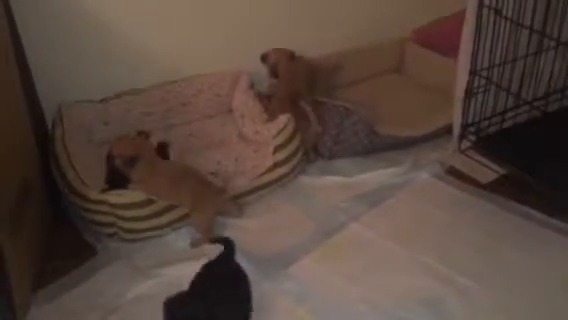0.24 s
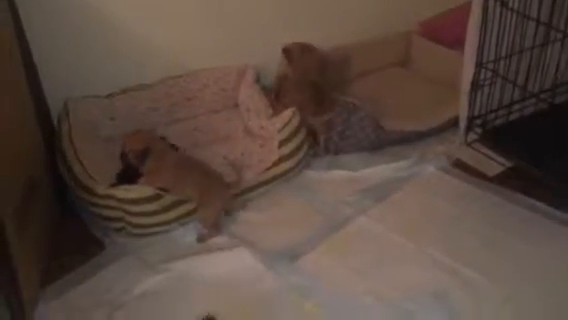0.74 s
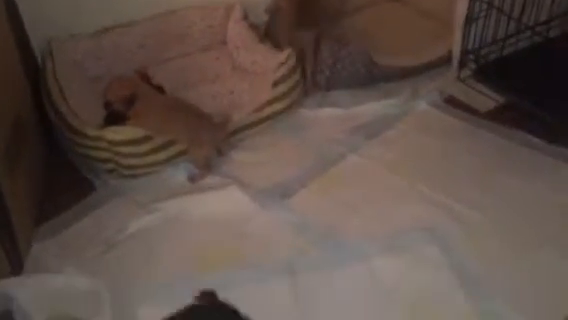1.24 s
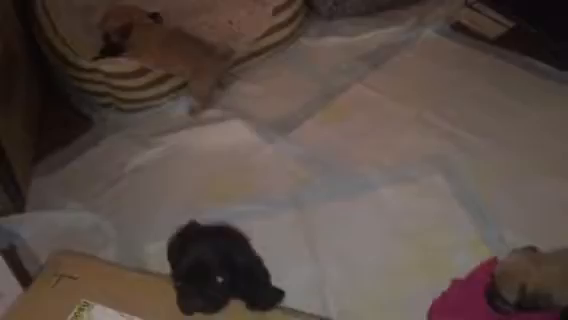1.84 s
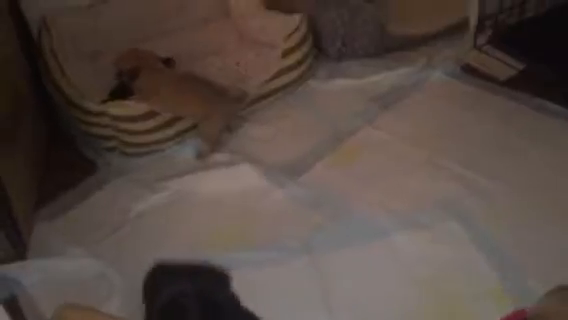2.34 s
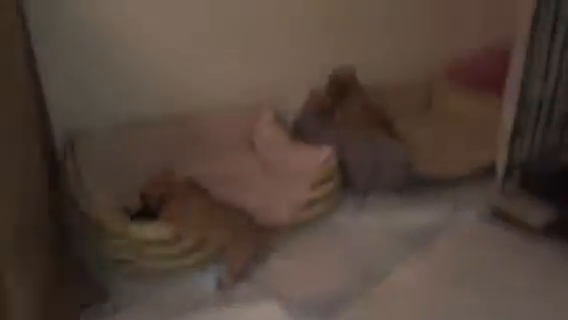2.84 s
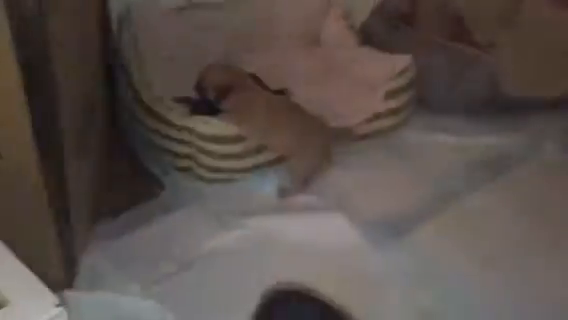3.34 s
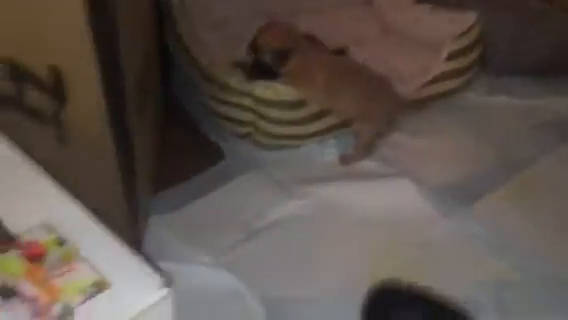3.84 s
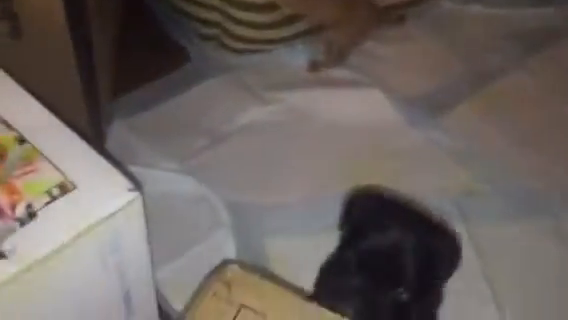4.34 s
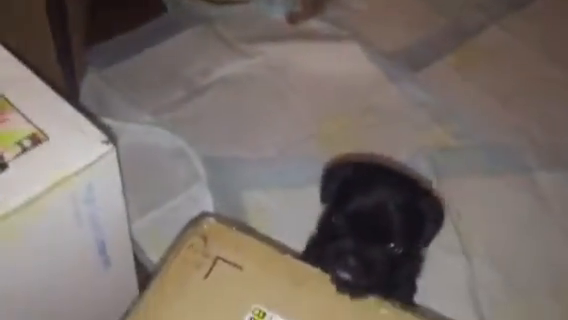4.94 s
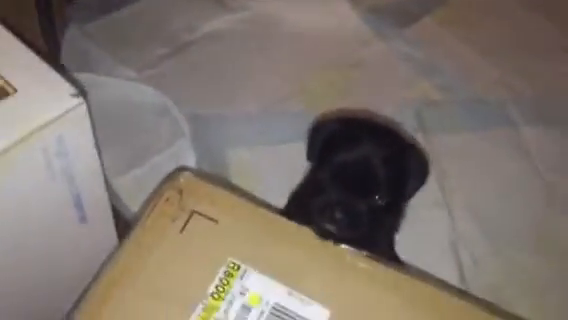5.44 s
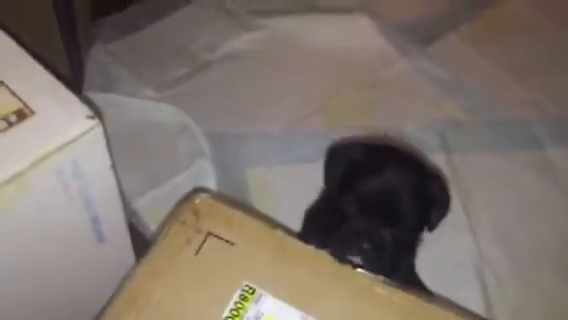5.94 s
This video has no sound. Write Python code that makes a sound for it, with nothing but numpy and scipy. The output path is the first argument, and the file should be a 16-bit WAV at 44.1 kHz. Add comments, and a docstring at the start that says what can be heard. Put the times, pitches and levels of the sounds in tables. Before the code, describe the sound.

In a small, quiet room with a low electrical hum, puppy pads rustle lightly under little paws close to the microphone. Short scratches and dull, soft thumps come first, followed by tiny sniffs and a single small raspy yelp. A flurry of sharp claw and tooth clicks on cardboard follows, dying down to a few taps, one more sniff and a final scrape.

```python
"""Young puppies potter about on rustling paper pads by a cardboard box; an appliance hums in the small room.
First bedding swishes and paws start to scratch: in each stroke a claw catches twice, the paw scrapes on
and its weight lands softly. Bodies bump, mostly along with the paw strokes. After two seconds claws and
teeth tick, one pup sniffs at the box, and just before three seconds one gives a small hoarse yelp.
The ticking is busiest around four seconds; a last sniff and a last paw stroke end the scene."""
import sys
import numpy as np
from scipy import signal
from scipy.fft import rfft, irfft, next_fast_len
from scipy.io import wavfile
from scipy.ndimage import map_coordinates

SR = 44100
rng = np.random.default_rng(int(sys.argv[2]) if len(sys.argv) > 2 else 0)


def log_audio(samples):
    """Write samples as a 16-bit WAV file to the path given in sys.argv[1]."""
    # one column per channel
    frames = np.atleast_2d(samples).T
    # limit to full scale, then quantise
    limited = np.clip(frames, -1, 1)
    pcm = np.round(limited * 32767).astype(np.int16)
    wavfile.write(sys.argv[1], SR, pcm)


N = 272538

# How much the pads shift under the pups. Each row: time in seconds, relative level in dB.
PAD_MOVEMENT = [(0, -61.5), (.5, -64), (.8, -66), (1.2, -57), (2.0, -63.5), (2.35, -58), (2.78, -60),
                (3.25, -60), (4.9, -62), (5.8, -77.5), (6.18, -58)]
# Paw strokes. Each row: time in seconds, relative levels of the snap and of the scrape in dB,
# width of the scrape in seconds, body (low tones) in dB, brightness (high tones) in dB.
PAW_STROKES = [(0.375, -44.5, -54.5, 0.03, 5, 2), (0.912, -45, -44, 0.027, -2, -4),
               (0.964, -32, -41.5, .034, -6.5, -6.5), (1.0849, -33.5, -44, 0.028, 0, -22.5),
               (1.162, -40.5, -43.5, 0.018, -3, -4.5), (1.2166, -37.5, -50.5, 0.041, -6, -1),
               (1.7584, -39.5, -48.5, 0.017, 2, -10.5), (1.852, -37.5, -53, 0.032, -4.5, -22),
               (2.092, -42.5, -44, 0.016, -16, -7.5), (2.209, -37, -53.5, 0.037, -7, -11.5),
               (2.469, -39.5, -48.5, 0.041, -7, -9.5), (3.093, -31.5, -46, 0.053, 3, -25),
               (3.221, -41.5, -49, 0.016, 4, -11), (3.277, -41, -63, 0.086, 8, -5.5),
               (3.422, -30.5, -49, 0.033, 0, -8), (3.563, -44, -57, 0.026, 7.5, -11),
               (3.7381, -28.5, -50.5, 0.041, -6.5, -9), (3.962, -36.5, -49.5, 0.028, -6, -8),
               (4.0873, -24.5, -37.5, 0.038, -5, -12), (6.146, -29.5, -48, 0.034, -7, -19)]


def amp(db):
    """Turn decibels into a factor to multiply by."""
    return 10 ** (np.asarray(db) / 20)


def unit(x):
    """Scale a sound to an average power of 1."""
    return x / np.sqrt(np.mean(x ** 2) + 1e-20)


def along(points, hz):
    """Read between (Hz, value) points, with octaves evenly spaced."""
    freqs, values = np.transpose(points)
    return np.interp(np.log(hz + 1), np.log(freqs + 1), values)


def curves(rows):
    """One value per sample for each column after the time."""
    times, *columns = np.transpose(rows)
    return [np.interp(np.arange(N) / SR, times, column) for column in columns]


def wobble(rate, size):
    """A smooth curve through `rate` random values a second."""
    knots = rng.standard_normal(int(size * rate / SR) + 4)
    return map_coordinates(knots, [np.arange(size) * rate / SR])


def filtered(x, response):
    """Multiply each frequency in x by response(Hz)."""
    size = next_fast_len(len(x) + 8192)
    return irfft(rfft(x, size) * response(np.fft.rfftfreq(size, 1 / SR)), size)[:len(x)]


def noise(size, colour):
    """Noise of power 1, coloured by (Hz, dB) points."""
    return unit(filtered(rng.standard_normal(size), lambda hz: amp(along(colour, hz))))


def quickest_ring(gain_db):
    """The promptest answer to a tap that has this gain at each frequency."""
    cepstrum = irfft(np.log(amp(gain_db)))
    half = len(cepstrum) // 2
    cepstrum[1:half] *= 2
    cepstrum[half + 1:] = 0
    return irfft(np.exp(rfft(cepstrum)))


def add(track, s, sound):
    """Mix a sound in, starting at s seconds."""
    start = round(s * SR)
    sound = sound[max(-start, 0):max(N - start, 0)]
    track[max(start, 0):][:len(sound)] += sound


def placed(sounds):
    """A track of (seconds, sound) pairs, each with its middle at its time."""
    out = np.zeros(N)
    for s, sound in sounds:
        add(out, s - len(sound) / 2 / SR, sound)
    return out


def swell(t, width, skew=1):
    """A rise and fall that peaks at t = 0; the fall lasts skew times the rise."""
    return np.exp(-np.abs(t / (width * np.sqrt(skew) ** np.sign(t))) ** 1.43)


def shaped(sound, envelope):
    """Give a sound the shape and the energy of a loudness curve."""
    return unit(sound * envelope) * np.sqrt(np.mean(envelope ** 2))


def tone(body_db, bright_db, hz):
    """Low and high tones in dB: a blunt contact has more body, a sharp one more treble."""
    return along([(900, body_db), (2200, 0), (3600, 0.017), (8000, bright_db)], hz)


def spot(hz, spread_db=2.8):
    """Every spot of the cardboard has its own chance peaks and dips, in dB."""
    knots = rng.standard_normal(60)
    return spread_db * np.interp(np.sqrt(hz / hz[-1]), np.linspace(0, 1, len(knots)), knots)


def crinkle(size, rate, spread_db, smooth):
    """Friction: tiny slips of unequal size, each a brief flutter, over a smooth hiss."""
    slipping = rng.random(size) < rate / SR
    slips = slipping * amp(spread_db * np.clip(rng.standard_normal(size), -2, 2))
    flutter = signal.lfilter([1], [1, -np.exp(-1 / (.0008 * SR))], slips)
    return unit(flutter * rng.standard_normal(size)) + smooth * rng.standard_normal(size)


def appliance(hum_hz=120.3, whine_hz=597):
    """A slightly unsteady mains hum and a thin whine, over the room's quiet air and rumble."""
    # The hum. Each row: time in seconds, relative level in dB.
    hum_levels = [(0.0, -61), (0.5, -59), (3.13, -65), (3.68, -69), (6.18, -71)]
    # The whine. Each row: time in seconds, level in dB.
    whine_levels = [(0, -81.5), (2.5, -72), (5.2, -80), (5.8, -96)]
    # The colour of the room's air. Each row: frequency in Hz, gain in dB.
    air_colour = [(15, -30), (25, -57), (120, 2), (175, -28), (326, -19.5), (531, -29), (591, -18.5),
                  (887, -25.5), (1650, -25), (4200, -27.5), (5570, -29.5), (10400, -37.5), (14800, -36.5),
                  (16000, -53)]
    t = np.arange(N) / SR
    hum = np.zeros(N)
    for hz, db in [(hum_hz, curves(hum_levels)[0] + 2), (whine_hz, curves(whine_levels)[0])]:
        level = amp(db + 0.19 * wobble(3.6, N))
        hum += level * unit(np.sin(2 * np.pi * hz * t + .1 * wobble(2, N)))
    air = noise(N, air_colour)
    rumble = noise(N, [(25, -21), (75, 1.5), (170, -8), (400, -25), (1500, -69)])
    return hum + amp(-68) * air + amp(-68.5 + 2.3 * wobble(3.1, N)) * rumble


def room(x, wall_delay_s=.005):
    """Near walls answer within milliseconds; each quarter second gets its own echo."""
    # How long the echo lasts. Each row: frequency in Hz, seconds to fade by 60 dB.
    fade_times = [(150, 0.31), (1000, 0.14), (4000, 0.16), (9000, 0.14), (16000, 0.12)]
    echo_colour = [(200, 3), (3000, -2), (14000, -2)]
    out = np.zeros(N)
    hop = SR // 4
    for start in range(0, N, hop):
        hz, t, spectrum = signal.stft(rng.standard_normal(SR // 3), SR, nperseg=256)
        fade = amp(-60 * t / along(fade_times, hz)[:, None])
        tail = signal.istft(spectrum * fade, SR, nperseg=256)[1]
        tail = filtered(unit(tail) / np.sqrt(len(tail)), lambda f: amp(along(echo_colour, f)))
        add(out, start / SR + wall_delay_s, signal.fftconvolve(x[start:start + hop], tail))
    return out


def bedding():
    """Under a climbing pup, cloth slides on cloth with a thin, high hiss."""
    # The colour of the cloth. Each row: frequency in Hz, gain in dB.
    cloth_colour = [(2000, -29), (4700, -6), (5300, 1.5), (6600, -5), (8000, -13), (10500, -18),
                    (12800, -14), (16000, -21)]
    # Swishes. Each row: time of the peak in seconds, width in seconds, level in dB.
    swishes = [(.1, 0.16, -64.5), (1.55, 0.19, -69.5)]
    t = np.arange(N) / SR
    envelope = sum(amp(db) * swell(t - s, width) for s, width, db in swishes)
    return noise(N, cloth_colour) * amp(4.1 * wobble(24.46, N)) * envelope


def paper_pads():
    """The pads never lie quite still; their low and high rustle come and go separately."""
    # The colour of the paper. Each row: frequency in Hz, gain in dB.
    paper_colour = [(150, 15.5), (400, 5.5), (900, 3.5), (1800, 4.5), (3000, -2.5), (4500, -11.5),
                    (5800, -7.5), (8000, -12.5), (11000, -18), (16000, -17.5)]
    db, = curves(PAD_MOVEMENT)
    slips = crinkle(N, rate=230, spread_db=14.5, smooth=2.37)
    paper = unit(filtered(slips, lambda hz: amp(along(paper_colour, hz))))
    low = filtered(paper, lambda hz: 1 / (1 + (hz / 2200) ** 4))
    high = paper - low
    return amp(db - 3.5) * (low * amp(0.76 * wobble(37, N)) + high * amp(3.5 * wobble(6, N)))


def footfalls(weight_hz=253.2, weight_fade_s=.11, patter_hz=96, patter_fade_s=.13, steps_per_s=6):
    """Rows for bumps(): the weight behind each stroke, and a faint patter that follows the rustle."""
    rows = [(s, scrape_db - 6.5, weight_hz * np.exp(rng.normal(0, 0.159)), weight_fade_s)
            for s, _, scrape_db, *_ in PAW_STROKES]
    beats = np.arange(0, N / SR, 1 / steps_per_s)
    for s in beats + rng.random(len(beats)) / steps_per_s:
        db = np.interp(s, *np.transpose(PAD_MOVEMENT)) + rng.normal(2, 3)
        rows.append((s, db, patter_hz * np.exp(rng.normal(0, .4)), patter_fade_s))
    return rows


def bumps():
    """The soft push of a body or paw gives a low, sagging note and a dull puff."""
    # Bodies bumping down. Each row: start in seconds, relative level in dB, rough pitch in Hz,
    # seconds to fade by 60 dB.
    body_bumps = [(.931, -35, 104, 0.096), (1.034, -39.5, 167, 0.085), (1.087, -34.5, 279.5, 0.15),
                  (1.76, -49, 241, 0.19), (1.851, -44, 288, 0.055), (2.188, -46, 459, 0.11),
                  (2.214, -32, 296, 0.044), (2.22, -34, 177, 0.059), (2.46, -49, 90, 0.13),
                  (2.577, -43, 227, .15), (3.222, -41.5, 139.3, 0.051), (3.421, -42, 494, 0.043),
                  (4.548, -46.5, 273, 0.057), (5.362, -34.5, 247, 0.01), (5.669, -49.5, 137, 0.03)]
    out = np.zeros(N)
    t = np.arange(SR // 4) / SR
    sag = 0.873 + .2 * np.exp(-t / 0.01)
    attack = 1 - np.exp(-t / 0.0025)
    for s, db, hz, fade_s in body_bumps + footfalls():
        note = np.sin(2 * np.pi * hz * np.cumsum(sag) / SR)
        puff = noise(len(t), [(30, -20), (hz / 2, -3), (hz, 0), (hz * 2, -14), (4000, -60)])
        add(out, s, shaped(note + 0.68 * puff, amp(db + 4 - 60 * t / fade_s) * attack))
    return out


def sniffs():
    """Air hisses through a tiny nose; the hiss climbs as the nostrils narrow."""
    # Sniffs. Each row: time of the peak in seconds, width in seconds, level in dB,
    # ring of the narrowed nostrils in Hz, airy treble in dB.
    breaths = [(2.422, 0.026, -46, 2810, 0.5), (2.61, 0.018, -52.5, 3000, -10),
               (2.985, 0.052, -52, 2830, 4.5), (3.682, .038, -49, 3030, 0), (5.544, 0.04, -47, 2680, -2)]
    # The colour of the nose, slid up or down for each sniff. Each row: frequency in Hz, gain in dB.
    nose_colour = [(300, -24), (1000, -19.5), (1900, -12.5), (2350, -7), (2800, 1), (3400, -7),
                   (4400, -13.5), (5100, -19.5), (6400, -12), (7800, -19.5), (11000, -23), (16000, -27.5)]
    out = np.zeros(N)
    t = np.arange(-SR // 4, SR // 4) / SR
    nose_hz = max(nose_colour, key=lambda point: point[1])[0]
    pinch = np.interp(t, [-.06, -.015], [0, 1])
    for s, width, db, hz, airy_db in breaths:
        hiss = np.zeros(len(t))
        for peak_hz, share in [(0.66 * hz, 1 - pinch), (hz, pinch)]:  # wide nostrils, then narrow
            nose = lambda f: amp(along(nose_colour, f * nose_hz / peak_hz) + tone(0, airy_db, f))
            hiss += np.sqrt(share) * unit(filtered(rng.standard_normal(len(t)), nose))
        add(out, s + t[0], shaped(hiss * amp(3 * wobble(58.2, len(t))), amp(db) * swell(t, width)))
    return out


def yelp():
    """A thin squeak breaks up into a rasp as the pup pushes harder."""
    # The course of the yelp. Each row: time in seconds, level in dB, pitch in Hz.
    course = [(2.812, -79, 800), (2.822, -57.5, 798), (2.838, -51, 797), (2.861, -48.5, 823),
              (2.871, -35, 803), (2.876, -63, 780), (2.9, -70, 770)]
    # Where the throat rings. Each row: frequency in Hz, width in Hz, gain in dB.
    resonances = [(802, 210, 0), (1320, 220, -3), (2080, 380, -2), (2380, 200, -5), (4050, 600, -14)]
    rasp_colour = [(200, -4), (560, 6.5), (850, 0.5), (1300, 2.5), (4500, 1), (12000, -2)]
    db, pitch = curves(course)
    phase = 2 * np.pi * np.cumsum(pitch * (1 + 0.068 * wobble(250, N))) / SR
    throat = lambda f: sum((-1) ** k * amp(gain) * 1j * f * width / (hz * hz - f * f + 1j * f * width)
                           for k, (hz, width, gain) in enumerate(resonances))
    breath = crinkle(N, rate=3800, spread_db=7, smooth=0.72)
    rasp = unit(filtered(breath, lambda f: throat(f) * amp(along(rasp_colour, f))))
    hoarse = np.interp(db, [-56, -48], [.55, .98])
    sounding = db > max(db[0], db[-1])
    return sounding * amp(db) * (hoarse * rasp + np.sqrt(1 - hoarse ** 2) * unit(np.sin(phase)))


def scuff(db, width, centre_hz, bright_db, skew=1):
    """The tiny slips of one rubbing paw sound through the cardboard."""
    # The colour of rubbed cardboard. Each row: frequency in Hz, gain in dB.
    cardboard = [(120, 6), (400, 0.5), (900, 2), (1300, 4), (1650, 5), (2400, 4.5), (3200, 6), (4700, 5),
                 (6300, 9.5), (8500, 8.5), (10500, 6), (16000, -4)]
    t = np.arange(-SR // 4, SR // 4) / SR
    contact = [(centre_hz / 4, -5), (centre_hz / 1.33, -1), (centre_hz * 1.06, 0),
               (min(centre_hz * 1.96, 7000), -9), (8000, bright_db)]
    slips = crinkle(len(t), rate=350, spread_db=6.5, smooth=1)
    rub = unit(filtered(slips, lambda hz: amp(along(cardboard, hz) + along(contact, hz) + spot(hz))))
    return shaped(rub * amp(3.4 * wobble(112, len(t))), amp(db - 1.5) * swell(t, width, skew))


def paws(scrape_lag_s=.009, scrape_hz=2100):
    """A paw scrapes on after each snap, duller but following its brightness; soft paws only brush."""
    # Soft paws brushing over the pads. Each row: time of the peak in seconds, width in seconds,
    # relative level in dB, centre frequency in Hz.
    soft_paws = [(0.023, .035, -58, 2030), (0.245, 0.042, -58.5, 2420), (.44, 0.047, -56.5, 980),
                 (0.626, 0.036, -56, 1710), (1.32, 0.023, -55, 2300), (1.47, 0.067, -59.5, 1890),
                 (2.63, 0.03, -52, 1540), (3.881, 0.065, -61, 1400), (4.28, .05, -60.5, 1400),
                 (4.767, 0.084, -65.5, 1590), (4.888, 0.012, -55, 2340), (6.041, 0.0094, -58.5, 2090),
                 (6.134, 0.018, -47, 1890)]
    # A higher brush is also brighter. Each row: centre frequency in Hz, brightness in dB.
    brightness = [(1000, -32), (2500, -18)]
    scrapes = [(s + scrape_lag_s, scuff(db, width, scrape_hz, -15 + 0.32 * bright, skew=1.82))
               for s, _, db, width, _, bright in PAW_STROKES]
    brushes = [(s, scuff(db, width, hz, along(brightness, hz))) for s, width, db, hz in soft_paws]
    return placed(scrapes + brushes)


def tick(db, body_db, bright_db, drag_rise_s=.026, chatter_fade_s=.011):
    """A claw drags, snaps free and chatters briefly, coloured by the spot of cardboard it hits."""
    # The colour of a claw on cardboard. Each row: frequency in Hz, gain in dB.
    claw_colour = [(150, -9.5), (450, 0), (1000, 6.5), (1650, 7.5), (2100, 5), (3300, 7.5), (4700, 2.5),
                   (6200, 6.5), (8500, 5), (11000, -0.5), (16000, -1.5)]
    middle, snap_samples = 1024, round(.003 * SR)
    t = np.arange(-middle, middle) / SR
    hz = np.fft.rfftfreq(len(t), 1 / SR)
    panel = quickest_ring(along(claw_colour, hz) + tone(body_db, bright_db, hz) + spot(hz))
    drag = .02 * amp(60 * t / drag_rise_s) * (t < 0)
    chatter = .2 * amp(-60 * np.abs(t) / chatter_fade_s) * (t >= 0)
    force = (drag + chatter) * rng.standard_normal(len(t))
    force[middle] = 1  # the claw snaps free
    snap = signal.fftconvolve(force, panel)[:len(t)]
    return amp(db - 1.05) * snap / np.sqrt(np.mean(snap[middle:middle + snap_samples] ** 2))


def claws(second_lag_s=0.004, second_db=-4.5, tap_body_db=-16.5):
    """A claw catches twice in a stroke, more weakly the second time, and once in a light tap."""
    # Light taps of a claw or tooth. Each row: time in seconds, relative level in dB, brightness in dB.
    light_taps = [(2.1816, -40.5, 1), (2.3041, -49.5, -10), (3.338, -49, -2), (3.41, -41, -11),
                  (3.5172, -38, 7), (3.6098, -45, 1), (3.9739, -36, -6), (4.0028, -37, -2),
                  (4.025, -38.5, -5), (4.0468, -35.5, -4), (4.058, -43, -4), (4.0713, -30.5, -23),
                  (4.0749, -33, -10), (4.0994, -30, -7), (4.139, -32.5, -10), (4.3128, -49.5, -35),
                  (4.383, -31.5, -6.5), (4.547, -27, -5), (4.5925, -45, -4), (4.647, -48.5, -11),
                  (4.8325, -48.5, 4), (4.9908, -46, -11), (5.0017, -40.5, -4), (5.3425, -46.5, -4),
                  (5.574, -35, -0.5), (6.1409, -39, -4)]
    first = [(s, tick(db, body, bright)) for s, db, _, _, body, bright in PAW_STROKES]
    second = [(s + second_lag_s, tick(db + second_db, body, bright))
              for s, db, _, _, body, bright in PAW_STROKES]
    taps = [(s, tick(db, tap_body_db, bright)) for s, db, bright in light_taps]
    return placed(first + second + taps)


def scene():
    """The pups, the room's answer to them, and the steady background."""
    snaps, scrapes, thuds = claws(), paws(), bumps()
    voices = yelp() + sniffs()
    echo = room(amp(-8) * snaps + amp(-7) * scrapes + amp(-12) * thuds + amp(-6) * voices)
    return (snaps + scrapes + thuds + voices + echo + paper_pads() + bedding() + appliance())[None]


def record(dry):
    """The microphone loses the deep bass and the very highest treble."""
    bass_hz, top_hz = 35, 16000
    microphone = lambda hz: (1j * hz / (bass_hz + 1j * hz)) ** 3 / (1 + (hz / top_hz) ** 200)
    return np.array([filtered(channel, microphone) for channel in dry])


dry = scene()
out = record(dry)
log_audio(out)
```